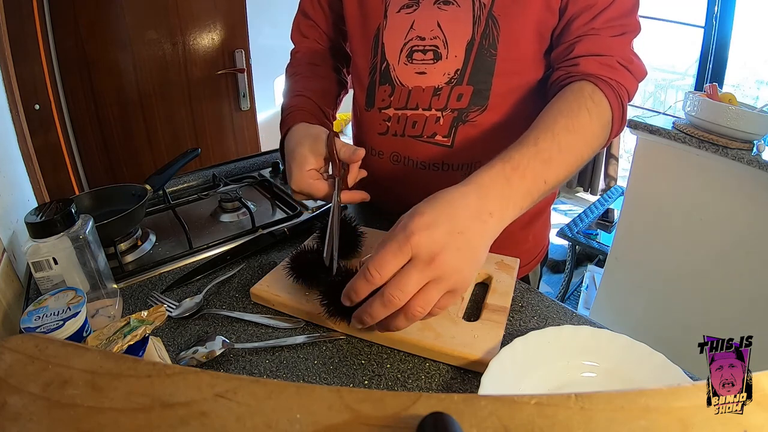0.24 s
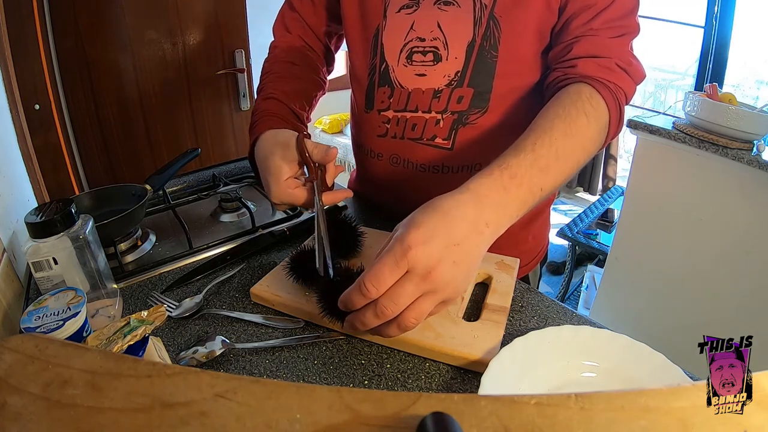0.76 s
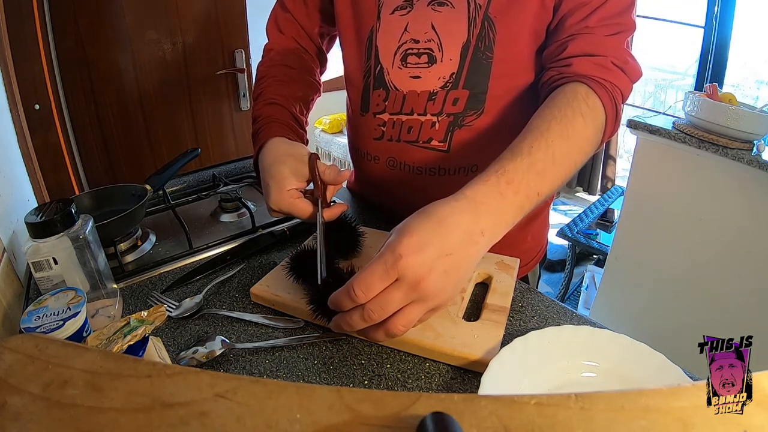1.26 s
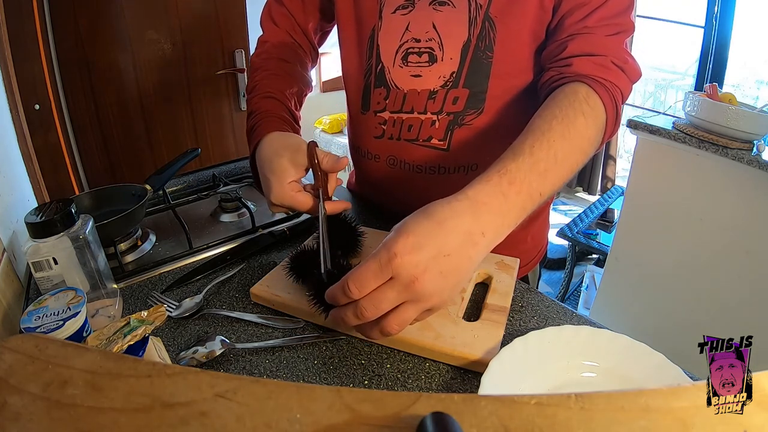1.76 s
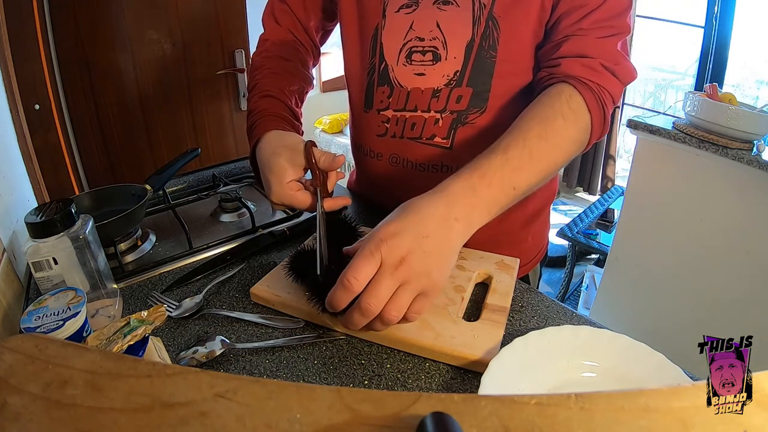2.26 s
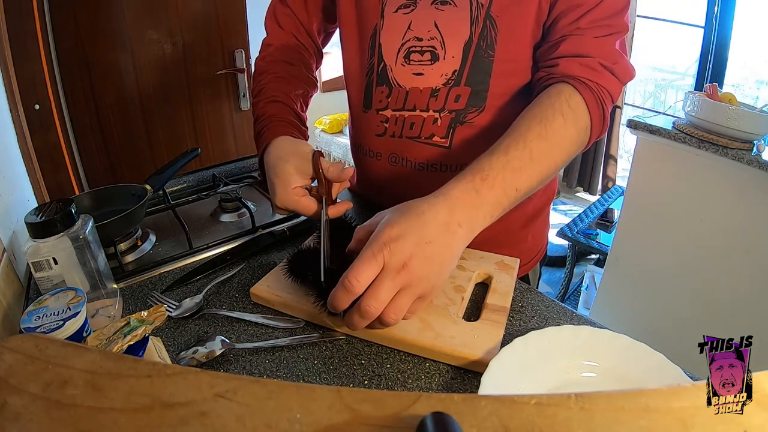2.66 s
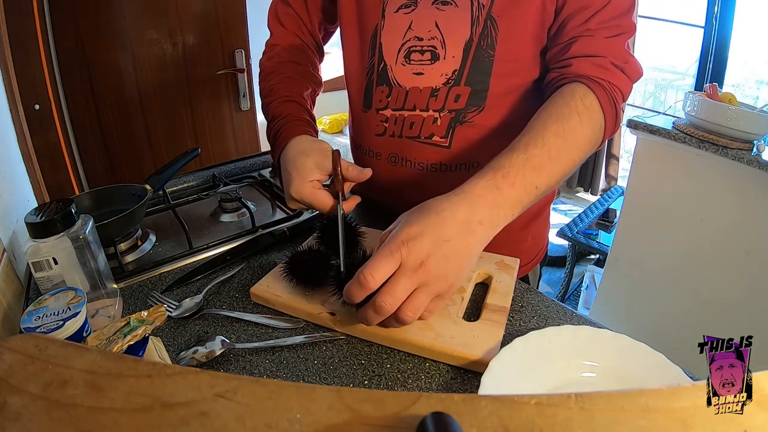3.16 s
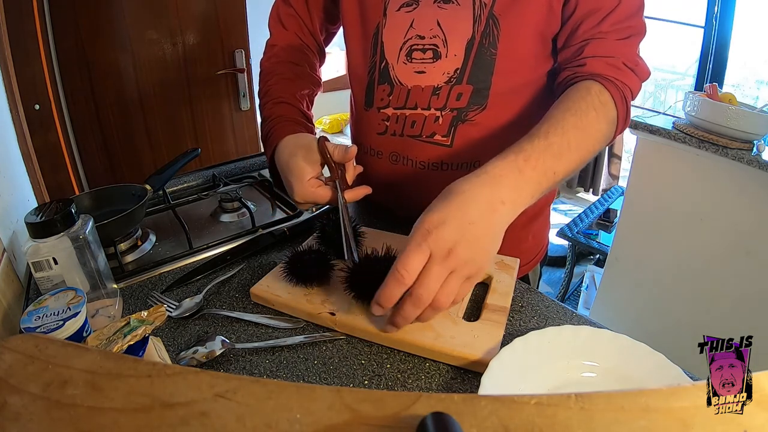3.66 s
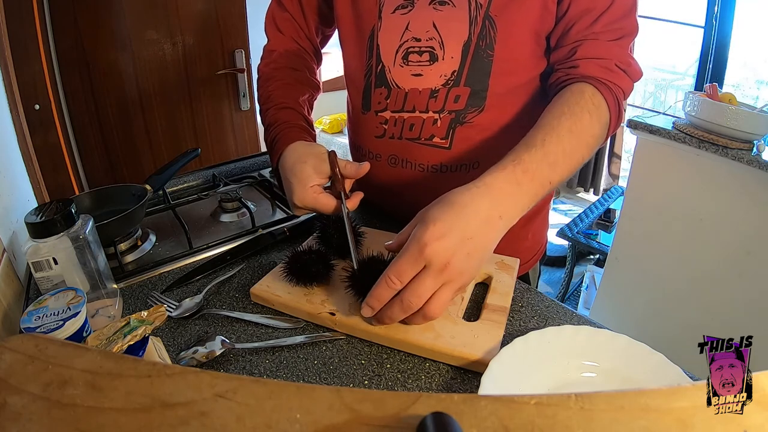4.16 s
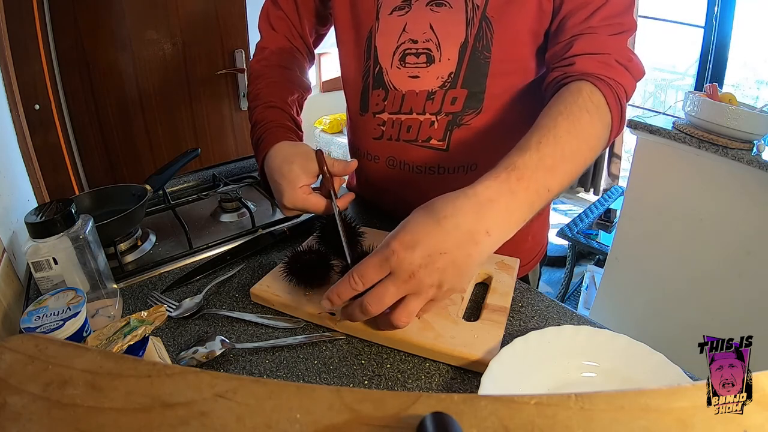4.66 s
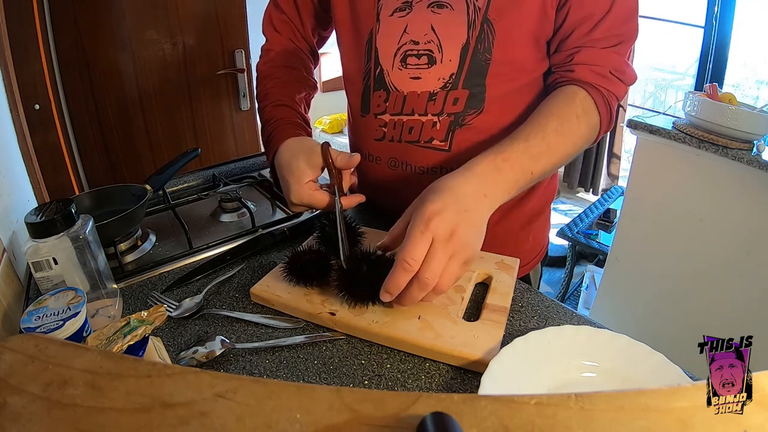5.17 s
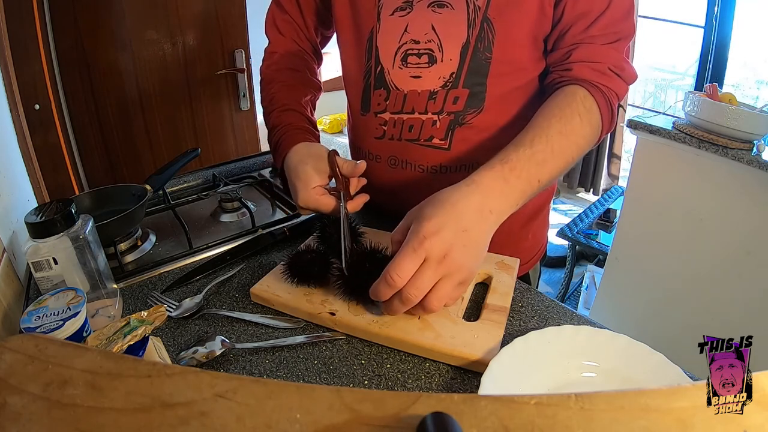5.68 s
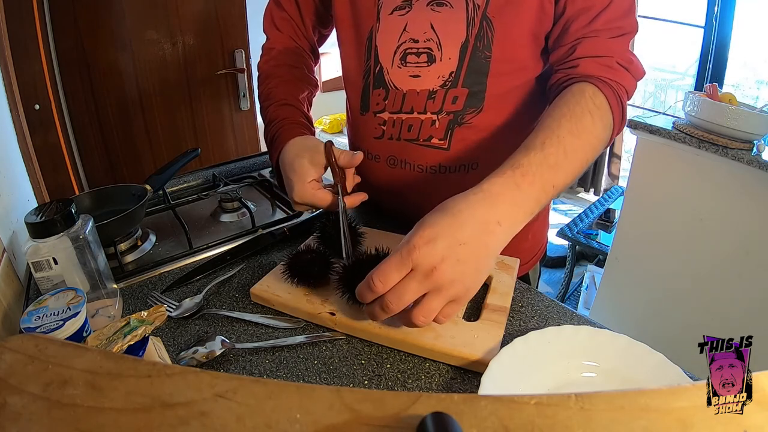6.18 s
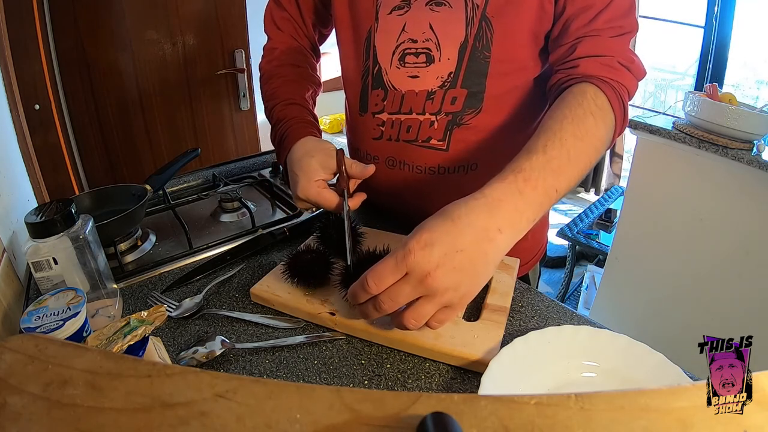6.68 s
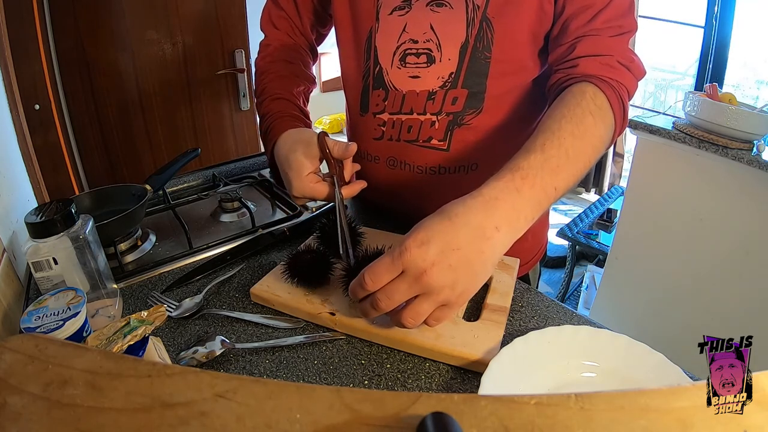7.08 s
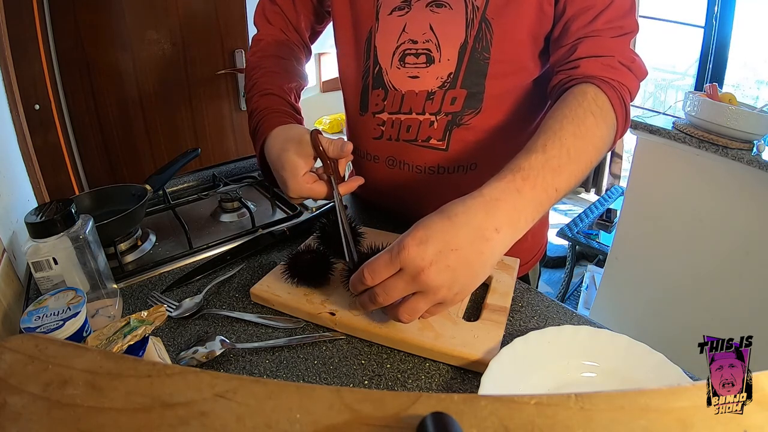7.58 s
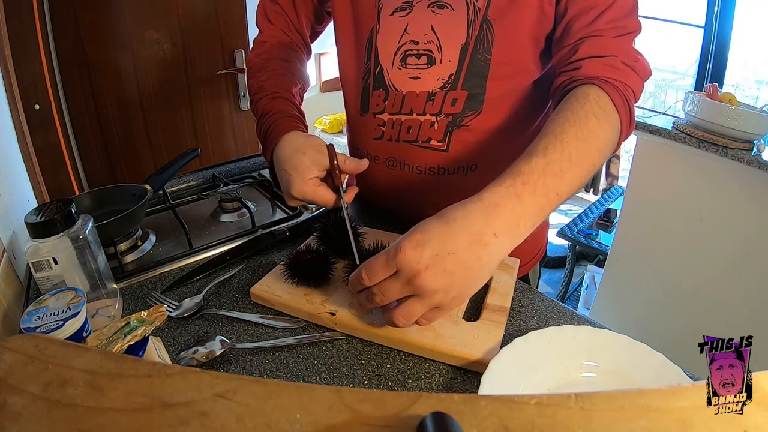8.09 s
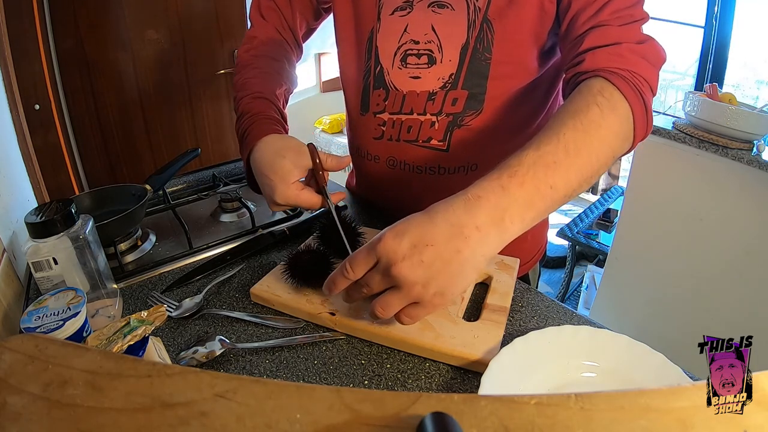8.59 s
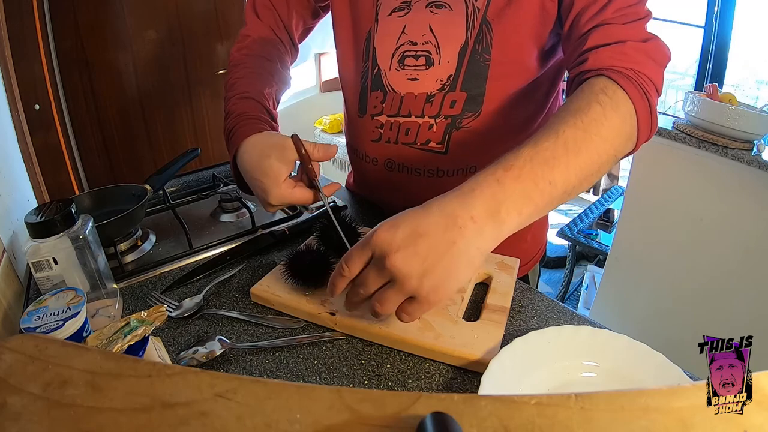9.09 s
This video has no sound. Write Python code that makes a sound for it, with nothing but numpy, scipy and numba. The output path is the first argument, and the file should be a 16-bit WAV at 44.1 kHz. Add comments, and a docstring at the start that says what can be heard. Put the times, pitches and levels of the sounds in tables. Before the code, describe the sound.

A quiet small kitchen, with the microphone standing on the counter beside the work. A barely audible far-off car horn fades within the first 0.4 s over soft handling. From 0.4 to 1.2 s scissors rasp among stiff spines with tiny ticks. At 1.2-1.7 s come hard, gritty, hollow cracks, the strongest near 1.35 and 1.56, with dull wooden thuds. Light scratching follows until sharp crunches at 2.75-2.9 and 3.2. After more rubbing, dense crunching runs 4.0-4.4 and 4.7-4.9, with deep soft knocks from the board. Small snaps lead to grainy clusters at 5.8-6.25 and 6.55-6.7, then a crack at 7.04. It is nearly quiet, with slight scrapes, until 7.9, when small cracks build to the loudest snap at 8.15. Faint rustles and ticks remain, and from 8.6 s a smooth, low humming rush from outside continues to the end.

```python
"""Scissors in a spiny shell

Scissors crunch through a spiny shell on a wooden board: grainy bursts and rasp excite its resonances.
The camera stands on the same counter, so pushes ring as deep thuds, decaying modes of the wood, while
cracks come through the air of a small kitchen, whose echoes are decaying bands of noise. Two partials
of a car horn sound far outside at the start; coloured noise gives the quiet and a late, smooth rush."""
import sys
import numpy as np
from scipy import signal
from scipy.fft import rfft, irfft, next_fast_len
from scipy.io import wavfile
from scipy.ndimage import uniform_filter1d
from numba import njit

SR = 44100
rng = np.random.default_rng(int(sys.argv[2]) if len(sys.argv) > 2 else 0)


def persist_wave(psi):
    """Save psi, clipped to +-1, as 16-bit WAV."""
    counts = np.round(np.clip(psi, -1, 1) * 32767).astype(np.int16)
    wavfile.write(sys.argv[1], SR, np.atleast_2d(counts).T)


N = 411872
T = np.arange(N) / SR  # s

# Shell breaks; all levels relative: t/s, peak level/dB, hollow ring f/Hz, treble share/dB,
# shell wall share/dB, length/ms
BREAKS = [(1.2118, -20, 3580, -13.5, -25, 2.07), (1.325, -26.5, 3400, -15.5, -21, 11.4),
          (1.3547, -12.5, 3500, -10.5, -23, 5.5), (1.4376, -33, 3600, -8.5, -11.5, 8.1),
          (1.5238, -19, 3420, -16, -21, 1.1), (1.559, -11, 3820, -9.5, -16.5, 5.6),
          (1.686, -28, 3092, -43, -20, 6.3), (2.7533, -30, 3090, -10.5, -32, 12),
          (2.798, -25.5, 5680, -38, -27, 9.7), (2.8433, -12.5, 4760, -11.5, -17, 5.9),
          (2.885, -19, 3800, -12.5, -19, 3.7), (3.1913, -13, 4230, -8, -49, 5.8),
          (3.38, -30, 2870, -11, -35, 4.3), (3.9853, -31.5, 4450, -6, -23, 4.2),
          (4.149, -18.5, 4500, -18, -24, 4.1), (4.1983, -17, 3220, -15.5, -18.5, 12),
          (4.251, -25.5, 3500, -25, -23, 6), (4.2599, -18, 3600, -15, -27, 7.7),
          (4.3833, -28, 3520, -14, -47, 5.5), (4.7031, -18.5, 3360, -15.5, -20.5, 6.9),
          (4.7709, -27.5, 3200, -10.5, -12, 11), (4.8168, -22.5, 2800, -14, -19.5, 5.4),
          (4.862, -17, 4250, -6, -20.5, 12.2), (5.794, -24, 2220, -31, -38, 1.8),
          (5.861, -23.5, 3110, -18, -39, 9.8), (5.894, -19.5, 2800, -16, -31, 6.7),
          (5.918, -18, 4820, -14, -18.5, 8.6), (6.0082, -22.5, 4300, -13.5, -34, 8.8),
          (6.1675, -29, 4400, -11, -29, 3.2), (6.23, -25, 4650, -10, -20, 5.6),
          (6.5742, -25, 4700, -11, -22, 4.5), (6.5976, -26, 3400, -12.5, -30, 7.8),
          (6.6339, -20, 2730, -16, -18, 4), (6.6717, -22.5, 3670, -6.5, -17.5, 8.4),
          (6.6945, -13.5, 4130, -9, -55, 6.3), (7.0401, -24, 2273, -18.5, -21.5, 5.9),
          (7.9234, -27.5, 3100, -14, -23, 6.8), (7.997, -26, 2750, -15, -17, 7.1),
          (8.012, -24, 3400, -6.5, -43, 5.3), (8.0411, -25, 3420, -21.5, -39, 6.4),
          (8.147, -8.5, 4220, -10.5, -55, 4.8)]
# Blades or fingers work among the spines, relative levels: start t/s, length/s, rasp level/dB,
# board tremor level/dB, deep share/dB, treble share/dB
STROKES = [(0.007, 0.14, -64.5, -41.5, -9, -13), (0.397, 0.42, -62, -49, -39, -15),
           (0.847, 0.82, -54, -42, -23, -8.5), (1.586, 0.13, -45, -41.5, 1.5, -21),
           (1.83, 0.26, -65.5, -58, -6, -4.5), (2.04, 0.16, -65, -50, -3, -5.5),
           (2.348, 0.077, -55.5, -40, -5.5, -5), (2.53, 0.43, -57, -43.5, -22, -7.5),
           (3.095, 0.41, -53.5, -42.5, -9, -9.5), (3.532, 0.44, -54.5, -48, -0.5, -38),
           (3.896, 0.23, -52.5, -43, -1.5, -8), (4.128, 0.32, -56.5, -44.5, 7, -11),
           (4.471, 0.19, -61.5, -52.5, 4.5, -8.5), (4.675, 0.24, -44, -34.5, 4, -11),
           (5.084, .1, -52, -35, 2.5, -8), (5.255, 0.15, -58.5, -48.5, -1, -5),
           (5.447, 0.17, -57, -39, -8.5, -20), (5.773, 0.24, -46.5, -38, -5.5, -7),
           (6.015, 0.42, -54.5, -43, 3.5, -13), (6.486, 0.12, -51.5, -34.5, -6.5, -17),
           (6.835, 0.092, -76, -44.5, 3.5, -9), (7.042, 0.24, -65.5, -67, -0.5, -2.5),
           (7.485, 0.034, -62, -59.5, 19, 3.5), (7.623, 0.18, -58.5, -51, 2.5, 2),
           (7.847, 0.17, -57, -42, -4, 0.5), (8.175, 0.2, -64, -45.5, 5.5, -8),
           (8.606, 0.15, -60.5, -54.5, -8, -5.5)]


def undb(db):
    """Amplitude is the exponential of level: 20 dB for each factor of ten."""
    return 10 ** (np.asarray(db) / 20)


def unit(x):
    """Normalisation to unit mean power."""
    return x / np.sqrt(np.mean(x ** 2))


def on_log(table, hz):
    """Interpolation along a logarithmic frequency axis, as pitch is heard."""
    f, v = np.transpose(table)
    return np.interp(np.log(hz + 1), np.log(f + 1), v)


@njit
def svf(x, hz, width):
    """Second-order resonance: a state-variable band-pass of movable centre, with gain 1 there."""
    y, band, low = np.empty(len(x)), 0., 0.
    for i in range(len(x)):
        g, damping = np.tan(np.pi * hz[i] / SR), width / hz[i]
        v = (band + g * (x[i] + 1e-18 - low)) / (1 + g * (g + damping))
        band = 2 * v - band
        low += 2 * g * v
        y[i] = damping * v
    return y


def svf_twice(x, hz, width):
    """Cascaded resonance: two equal band-passes steepen the skirts."""
    return svf(svf(x, hz, width), hz, width)


def resonate(x, peaks):
    """Parallel resonances: broad modes share one excitation, with alternating sign."""
    still = np.ones(len(x))
    return sum((-1) ** k * undb(db) * svf_twice(x, f * still, 1. * w)
               for k, (f, w, db) in enumerate(peaks))


def ring(rub, at, size, modes):
    """Modal synthesis: rubbing and blows excite decaying sines, each blow favouring other modes."""
    shape = (len(at), len(modes))
    share = undb(2.5 * rng.standard_normal(shape)) * (-1) ** rng.integers(2, size=shape)
    out = 0
    for k, (hz, db, t60) in enumerate(modes):
        push = rub * (-1) ** k
        push[at] += size * share[:, k]
        pole = np.exp(2j * np.pi * hz / SR - np.log(1000) / (t60 * SR))
        out = out + undb(db) * signal.lfilter([1], [1, -pole], push).imag
    return out


def walk(rate):
    """Slow random modulation: normal levels held 1 / rate s and slewed; spread near 1."""
    k = int(SR / rate)
    held = np.repeat(rng.standard_normal(N // k + 1), k)
    return uniform_filter1d(held, k)[:N]


def crackle(per_s, spread_db):
    """Random impulse process: scattered clicks of uneven size, rms 1."""
    hit = rng.random(N) < per_s / SR
    return unit(hit * rng.standard_normal(N) * undb(spread_db * rng.exponential(size=N)))


def flares(per_s, fade_s):
    """Sudden release with exponential decay each time a spine snaps free; rms 1."""
    loudest = 4.
    snaps = np.minimum(np.abs(crackle(per_s, 3.2)), loudest * np.sqrt(SR / per_s) / 4)
    return unit(signal.lfilter([1], [1, -np.exp(-1 / (fade_s * SR))], snaps))


def swell(start, length, db, fade_s):
    """Power addition of envelopes: each stroke rises, holds and dies away."""
    attack_s = 0.03
    coarse = T[::64]
    t = coarse - np.asarray(start)[:, None]
    fade = np.exp(-np.maximum(t - np.asarray(length)[:, None], 0) / fade_s)
    shape = np.clip(t / attack_s, 0, 1) * fade
    power = np.sum((undb(db)[:, None] * shape) ** 2, axis=0)
    return np.interp(T, coarse, np.sqrt(power))


def after_breaks(under_db, fade_s):
    """Residual motion: an envelope that follows every break, under_db relative to it."""
    s_break, break_db = np.transpose(BREAKS)[:2]
    return swell(s_break, 0 * s_break, break_db + under_db, fade_s)


def trembling():
    """Excitation of the board by strokes and the aftershake of breaks: overall, then deep part."""
    s, length, _, db, deep_db, _ = np.transpose(STROKES)
    after = after_breaks(-24, 0.079)
    return [np.hypot(swell(s, length, d, 0.056), after) for d in (db, db + deep_db)]


def air(spectrum):
    """Diffuse-field coherence: coloured noise, most alike at both ports in the bass."""
    hz = np.fft.rfftfreq(N, 1 / SR)
    colour = undb(on_log(spectrum, hz))
    mid, side = (irfft(rfft(rng.standard_normal(N)) * colour * w, N)
                 for w in (1, np.clip(hz / 800., .25, .9)))
    return np.array([mid + side, mid - side]) / np.std(mid)


def quiet():
    """Stationary ambient noise: the air of the room and the street, its level drifting slowly."""
    # Ambient spectrum, relative: f/Hz, level per Hz/dB
    ambient = [(59, -46.5), (100, -18.5), (173, -6), (277, -15), (707, -41), (849, -26), (999, -38.5),
               (1730, -38.5), (2170, -44), (8650, -51.5), (13000, -67)]
    return undb(-60.5 + 2 * walk(0.55)) * air(ambient)


def rush():
    """Amplitude-modulated noise: a smooth rush and hum swell from outside near the end."""
    # Rush spectrum, relative: f/Hz, level per Hz/dB
    spectrum = [(90, -27), (150, 3.5), (320, -32), (850, -18.5), (1300, -32), (2200, -26.5), (3100, -27.5),
                (4200, -36), (6400, -37), (6800, -27), (7200, -29), (11000, -58)]
    from_s, rise_s = 8.6, 0.088
    rise = np.clip((T - from_s) / rise_s, 0, 1)
    return undb(-57.0 + 2.3 * walk(13)) * rise * air(spectrum)


def horn():
    """Harmonic synthesis: the upper partial is lost first; both waver on the way through the window."""
    # Partials: multiple of the fundamental, mean level/dB, heard until t/s
    partials = [(2, -73, .38), (3, -73, .13)]
    fundamental_hz, fade_s = 420, 0.018
    return np.array([sum(undb(db + 2 * walk(17)) * np.clip((end_s - T) / fade_s, 0, 1)
                         * np.sin(2 * np.pi * k * fundamental_hz * T) for k, db, end_s in partials)
                     for _ in range(2)])


def kitchen(x):
    """Reverberation: a decaying noise tail for each band, partly alike at the two ports."""
    # Wall echoes: f/Hz, decay time t60/s, relative level/dB
    walls = [(580, 0.27, -18), (1600, 0.093, -23.5), (3540, 0.19, -29.5), (7560, 0.18, -20),
             (11000, 0.063, -18)]
    t = T[:int(.5 * SR)]

    def tail():
        """Exponential decay of each band, 60 dB in its t60."""
        return sum(undb(db - 60 * t / t60) * np.minimum(t / 0.00046, 1)
                   * unit(svf(rng.standard_normal(len(t)), hz + 0 * t, 1.5 * hz))
                   for hz, t60, db in walls)

    shared, *own = [tail() for _ in range(3)]
    return np.array([signal.fftconvolve(x, undb(-4.5) * shared + h)[:N] for h in own]) * undb(-21.0)


def rocking():
    """Base excitation: the camera foot rocks as the counter sways, unrelated at the two ports."""
    shake = [unit(resonate(rng.standard_normal(N), [(50.0, 36.0, 0)])) for _ in range(2)]
    size = trembling()[1] * undb(-7.0) + undb(-71.0)
    return size * undb(np.array([[-2.5], [2.5]])) * np.array(shake)


def counter():
    """Structure-borne sound: soft jolts and the tremor of rubbing ring the modes of board and counter."""
    # Shell jolted against the board, relative levels: t/s, level/dB, deep share/dB, knock share/dB
    thuds = [(0.028, -32.5, -37, -19), (1.222, -30.5, -32.5, -9.5), (1.359, -19.5, 1, -4),
             (1.562, -17, -2.5, -16), (2.062, -39.5, 14, -10), (2.392, -35.5, -1.5, -11),
             (2.844, -24.5, 6, -5), (3.054, -32, 4, -21), (3.148, -30.5, 2, -40), (3.332, -29, -24.5, -26),
             (3.427, -24.5, -8, -17), (3.932, -35, -1, -16.5), (3.99, -30, -7, -25), (4.151, -24, -29, -21),
             (4.209, -17, -16, -18.5), (4.257, -23.5, -13, -8.5), (4.708, -25, -10, -10.5),
             (4.788, -22.5, 9.5, -15.5), (5.126, -29.5, 1, -21), (5.255, -32.5, 4, -17),
             (5.372, -32.5, -5, -21), (5.863, -28.5, 3, -15.5), (5.915, -28.5, 15, -2.5),
             (6.091, -29.5, 1, -43), (6.349, -32.5, -4, -15), (6.244, -28, -15.5, -16),
             (6.675, -27, -7, -9.5), (6.89, -33.5, -6, -19), (7.515, -36.5, -2.5, -19.5),
             (7.708, -35.5, -27, -24), (8.148, -20.5, -12.5, -22)]
    # Modes of counter and board in three ranges: f/Hz, relative level/dB, decay time t60/s
    deep_modes = [(56, -5, 0.025), (77, -1.5, 0.21), (99, 1, 0.048)]
    body_modes = [(115.4, -7, 0.21), (123.9, -6, 0.37), (155.44, 2, 0.32), (175.4, 2.5, 0.24),
                  (221.6, -5, 0.18), (249.4, -4, 0.19)]
    knock_modes = [(296.3, 12, 0.11), (337.6, 1.5, 0.23), (385.5, 5.5, 0.2), (446.3, 1, 0.2),
                   (562, -6, 0.069), (694, -0.5, 0.083)]
    s, db, deep_db, knock_db = np.transpose(thuds)
    tremor, sway = undb(-32.5) * crackle(80, 2.2) * np.array(trembling())
    at = (s * SR).astype(int)
    deep = ring(sway, at, undb(db + deep_db - 4.5), deep_modes)
    body = ring(tremor, at, undb(db - 6.0), body_modes)
    knock = ring(tremor * undb(-20.0), at, undb(db + knock_db - 12.0), knock_modes)
    # spines cushion each push, and the heavy counter takes longer to get moving
    cushion = [np.hanning(int(ms * SR / 1000)) for ms in (9.0, 3.5, 1.6)]
    wood = sum(np.convolve(x, h / h.sum(), "same") for x, h in zip((deep, body, knock), cushion))
    # high-pass: keeps the ringing modes from leaking below the deep thuds
    return signal.lfilter(*signal.butter(2, 50., "high", fs=SR), wood)


def rubbing():
    """Frictional work: envelopes of strokes and sliding debris, and the treble share of that work."""
    s, length, rasp_db, _, _, tips_db = np.transpose(STROKES)
    fade_s = 0.022
    debris = after_breaks(-38, 0.12)  # loose pieces go on sliding
    work = np.hypot(swell(s, length, rasp_db, fade_s), debris)
    treble = np.hypot(swell(s, length, rasp_db + tips_db, fade_s), debris * undb(-3.5))
    return work, treble / (work + 1e-9)


def spine_rasp(work, tips):
    """Stick-slip: spines catch and let go in grains, here for the wall, the hollow and the treble."""
    rasp = work * undb(-6.0 + 4.57 * walk(70)) * crackle(7000, 0.99)
    # thick spines flare in the shell, thin tips in the treble
    thick = rasp * (1 + 0.6 * flares(140, 0.0044))
    bright = svf(rasp, 6500 + 0 * T, 8300.0) * tips * undb(1.0)
    return thick * undb(-11.5), thick * undb(5.0), bright * (0.53 + 1.4 * flares(60, 0.01))


def spine_chirr(work):
    """Resonance set by length: spines of different length chirr in flares of their own."""
    # Spine resonances: f/Hz, relative level/dB
    tones = [(2000, 4.5), (3100, 0.5), (3800, 5.5), (5600, 0.5), (7300, -3.5)]
    return sum(resonate(rng.standard_normal(N) * work * flares(25, 0.012), [(hz, hz / 3, db)])
               for hz, db in tones)


def fractures(held_hz, hollow_hz):
    """Brittle fracture: bursts for hollow, wall and treble; each sets the hollow pitch for 30 ms."""
    # Further, weaker breaks, with a common wall share and length and the hollow's held pitch, relative levels:
    # t/s, peak level/dB, treble share/dB
    weak_breaks = [(0.497, -40.5, -13), (0.547, -40.5, -10.5), (0.656, -45.5, -12), (0.8646, -47, 1),
                   (.8847, -38.5, -9), (1.003, -40.5, -16), (1.0286, -43, -21), (1.126, -33.5, -16),
                   (1.5512, -24, -12.5), (1.7183, -37.5, -7.5), (1.742, -39.5, -7.5), (1.8147, -35, -27),
                   (1.933, -44.5, -15), (2.0545, -48, -13), (2.118, -49, 6.5), (2.375, -48, -28),
                   (2.701, -37, -8.5), (3.0013, -47.5, -2.5), (3.116, -49, -25), (3.6166, -41, -9),
                   (3.9205, -38.5, -23), (3.972, -41, -19), (4.0123, -32.5, -27), (4.1048, -39, -7),
                   (4.329, -31.5, -24), (4.6876, -33, -14), (4.76, -21.5, -17), (5.118, -44, -0.5),
                   (5.3252, -41, -27), (5.4, -41, -30), (5.4608, -43, -25), (5.662, -39.5, -16.5),
                   (5.8113, -39, -2), (6.108, -41, -18), (6.3448, -39.5, -5), (6.534, -35.5, -11),
                   (6.8525, -34, -16.5), (7.004, -43.5, -5.5), (7.963, -43, -9.5), (8.1204, -40.5, -9),
                   (8.323, -38.5, -5.5), (8.646, -49, 5.5), (8.7053, -52.5, 1.5), (9.1538, -45, -11.5)]
    weak_wall_db, weak_ms = -23, 5.4
    click_db, click_after_s = 1, .002  # one hard click inside each break
    weak = [(t0, db, held_hz[int(t0 * SR)], treble_db, weak_wall_db, weak_ms)
              for t0, db, treble_db in weak_breaks]
    splinters = crackle(9000, 1.5) * undb(1.7 * walk(500))
    breaks, wall, treble = np.zeros((3, N))
    for t0, db, hz, treble_db, wall_db, ms in BREAKS + weak:
        i = int(t0 * SR)
        t = T[:min(int(.1 * SR), N - i)]
        # the fracture swells, runs on for some ms, then loose pieces rattle out
        run = np.exp(-(t / (max(ms, 1.5) / 1000)) ** 3) + undb(-16.5) * np.exp(-t / 0.021)
        grains = splinters[i:i + len(t)]
        grains = grains / np.std(grains[:int(max(ms, 2) * SR / 1000)])
        burst = undb(db) * np.minimum(t / 0.0026, 1) * run * grains
        burst[int(click_after_s * SR)] += undb(db + click_db)
        breaks[i:i + len(t)] += burst
        wall[i:i + len(t)] += burst * undb(wall_db)
        treble[i:i + len(t)] += burst * undb(treble_db)
        hollow_hz[i:i + int(.03 * SR)] = hz
    return breaks, wall, treble, uniform_filter1d(hollow_hz, size=40)


def shell():
    """Source and resonator: breaks and rasp excite the shell's hollow, its wall and the bright blades."""
    # The hollow rings higher or lower each time it is gripped anew:
    # from t/s, f/Hz, how strongly the rasp rings it/dB
    grips = [(0, 3300, -9), (0.379, 3350, 4), (.99, 3480, 6), (1.45, 3770, -18), (1.8, 4300, -5),
             (2.519, 3750, 3.5), (2.951, 4600, -8), (3.82, 4580, 0), (4.19, 3400, 5), (4.45, 4660, 4),
             (4.561, 3290, -4), (5.05, 3200, -16), (5.49, 4640, -1), (5.749, 4670, -17.5), (6.55, 3000, -6),
             (6.8, 2940, -1), (7.9, 3060, 2), (8.14, 2970, -3)]
    # Resonances: f/Hz, width of one pass/Hz, relative level/dB; first the wall against the board
    wall_peaks = [(633, 570, -2), (880, 640, -5), (1420, 350, -1)]
    # the same columns for shell and blades, then for their treble
    shell_peaks = [(2370, 4640, -13.5), (3085, 860, -3.5), (4070, 2200, -16.5)]
    sheen_peaks = [(5900, 7500, -10.5), (7900, 2780, 2.5), (9134, 3570, -9), (12900, 1000, -27.5)]
    work, tips = rubbing()
    s_turn, turn_hz, grip_db = np.transpose(grips)
    grip = np.searchsorted(s_turn, T, "right") - 1
    held_hz = turn_hz[grip]
    breaks, wall_breaks, treble_breaks, hollow_hz = fractures(held_hz, held_hz + 150. * walk(50))
    wall_rasp, hollow_rasp, treble_rasp = spine_rasp(work, tips)
    # a break jars the whole shell, so it rings the hollow less purely than the rasp does
    struck = undb(-1.0) * svf_twice(breaks, hollow_hz, 900.0)
    pings = undb(grip_db[grip] + 3.0 * walk(40)) * hollow_rasp
    hollow = struck + svf_twice(pings, hollow_hz, 500.0)
    rustle = resonate(hollow_rasp, [(2900, 4700, -11.5)])
    body = hollow + resonate(breaks, shell_peaks) + rustle + undb(-7.5) * spine_chirr(work)
    wall = resonate(wall_rasp + wall_breaks, wall_peaks)
    sheen = resonate(treble_rasp + treble_breaks, sheen_peaks)
    return undb(13.0) * wall + undb(7.0) * body + undb(10.0) * sheen


def ports(x):
    """Interchannel phase and level differences: a near source meets two ports, depending on pitch."""
    # Phase by which the left microphone port leads: f/Hz, lead/rad
    port_lead = [(500, -.1), (950, 1.1), (1210, 4.8), (1800, 6.6), (2300, 5.6), (4800, 6.5), (8200, 8.6),
                 (10200, 7.3), (16000, 7.5)]
    # Level difference, left minus right: f/Hz, level/dB
    port_db = [(40, 0.5), (200, 2.5), (700, -0.5), (2400, 2), (8000, 2)]
    size = next_fast_len(N + 4096)
    hz = np.fft.rfftfreq(size, 1 / SR)
    tilt = undb(on_log(port_db, hz) / 2)
    lag = np.exp(-1j * on_log(port_lead, hz))
    return np.array([irfft(rfft(x, size) * h, size)[:N] for h in (tilt, lag / tilt)])


def scene():
    """Superposition: direct sound, echoes, rocking and background add at the two ports."""
    crunch, wood = shell(), counter()
    background = quiet() + rush() + horn()
    return ports(crunch + wood) + kitchen(crunch + undb(-8.0) * wood) + rocking() + background


def record(dry):
    """Band limiting: the camera cuts rumble and the top."""
    rumble_hz, top_hz = 38., 15300
    sos = np.vstack([signal.butter(4, rumble_hz, "high", fs=SR, output="sos"),
                     signal.ellip(8, .2, 70, top_hz, fs=SR, output="sos")])
    return signal.sosfilt(sos, dry)


dry = scene()
out = record(dry)
persist_wave(out)
```